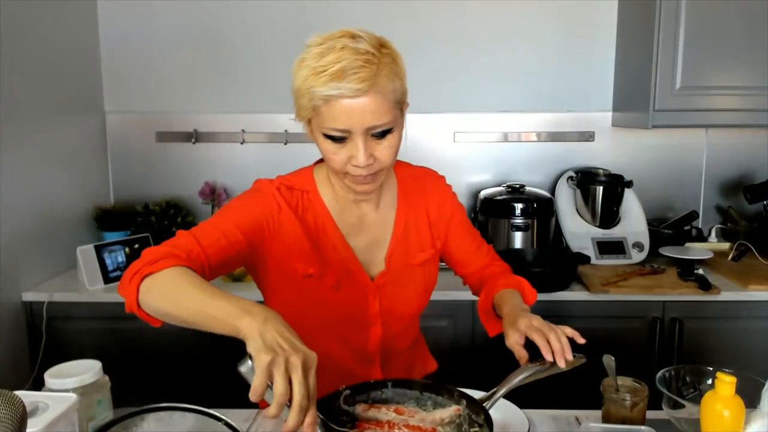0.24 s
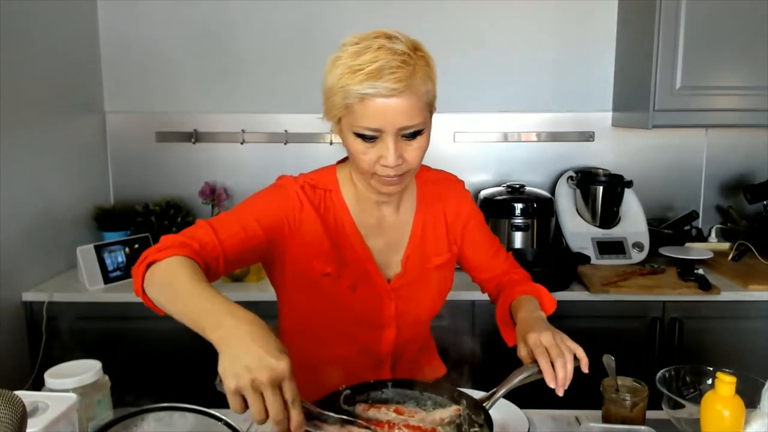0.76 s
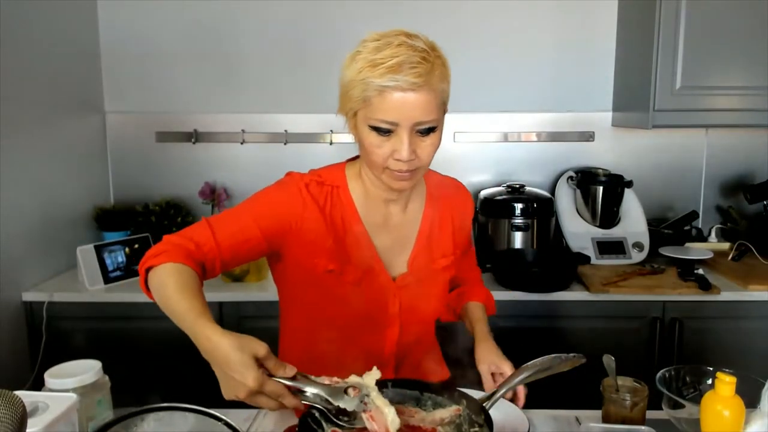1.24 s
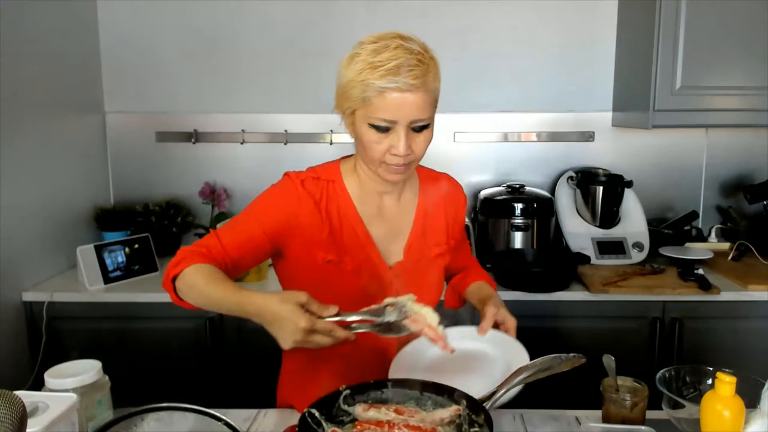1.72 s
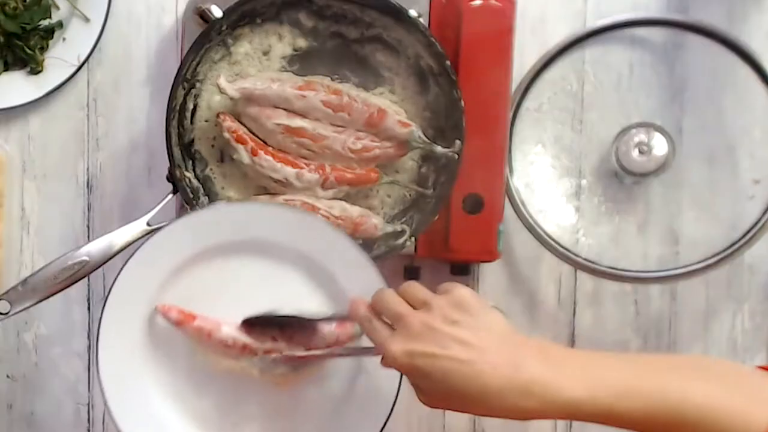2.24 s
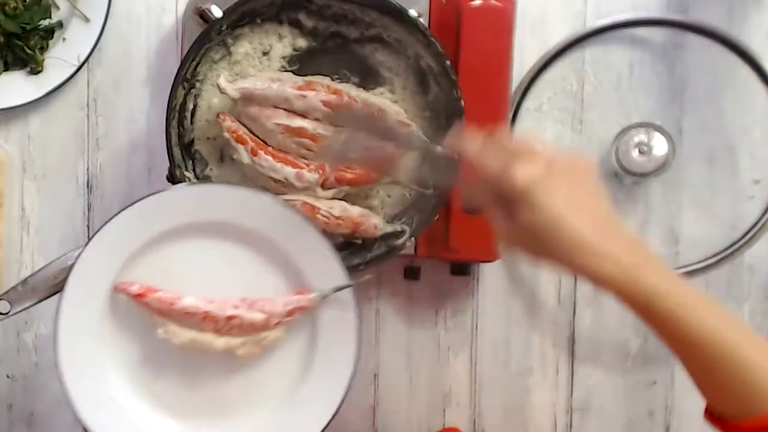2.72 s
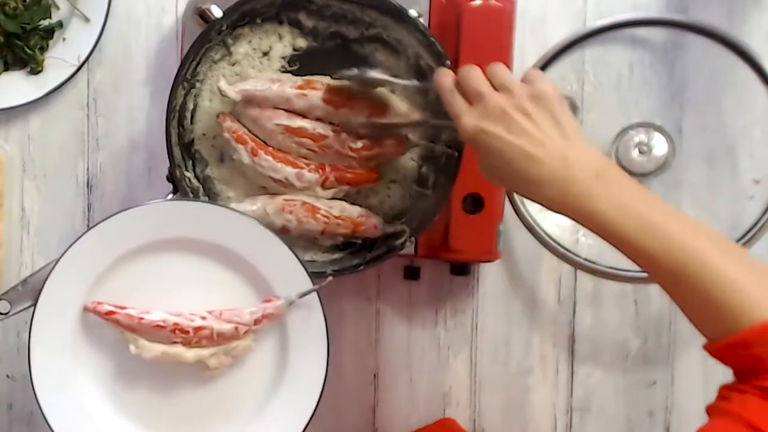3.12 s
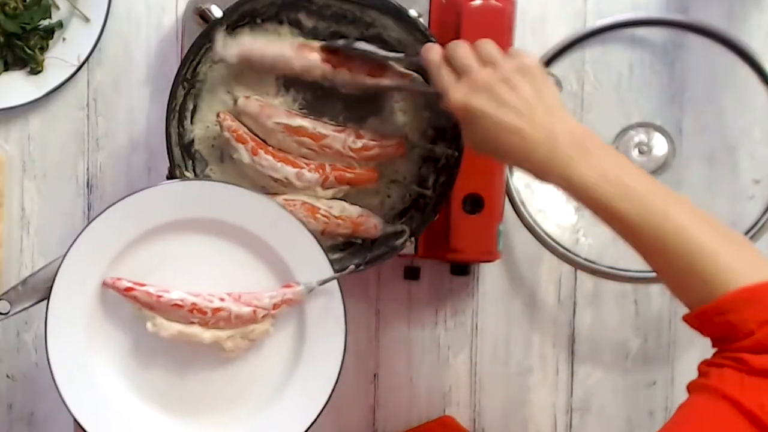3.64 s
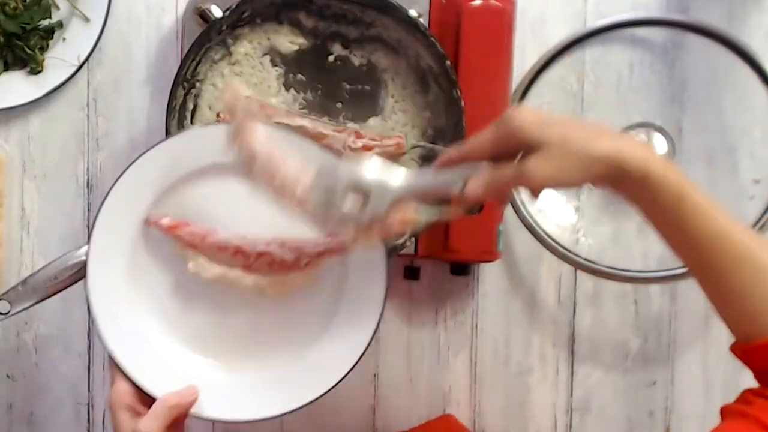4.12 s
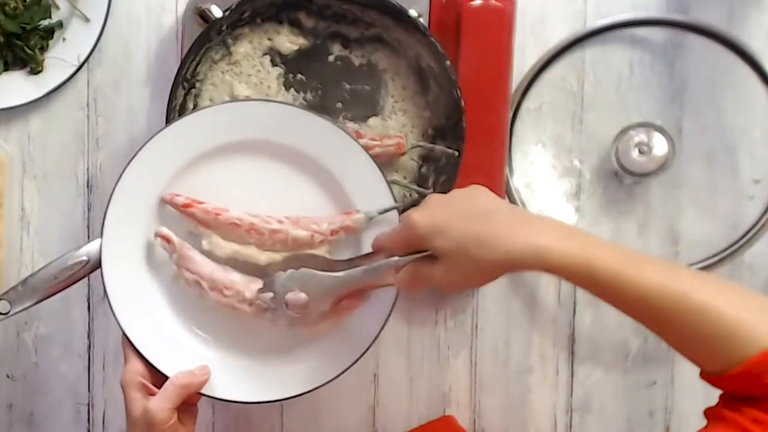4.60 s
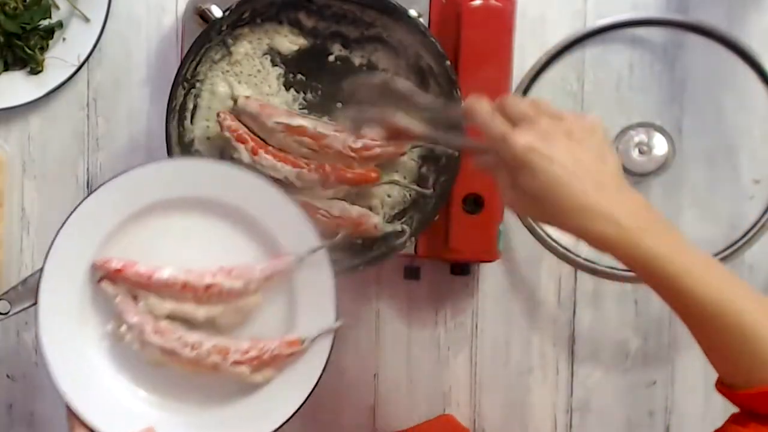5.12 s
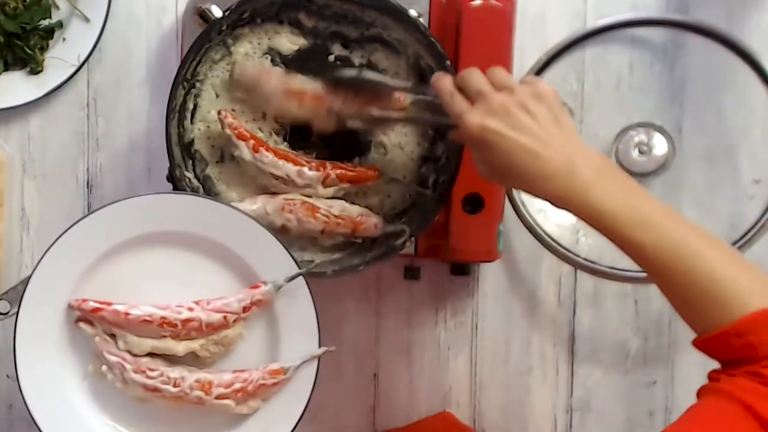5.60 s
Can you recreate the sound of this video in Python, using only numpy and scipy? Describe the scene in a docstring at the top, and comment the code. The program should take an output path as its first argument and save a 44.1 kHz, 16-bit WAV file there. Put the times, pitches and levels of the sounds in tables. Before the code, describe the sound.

Steel tongs knock dully on a simmering pan and clack sharply on a china plate, over faint, steady sizzle in a kitchen.

```python
"""Serving fish with steel tongs

Steel tongs lift fish from a simmering pan onto a china plate in a hard-walled kitchen.
The tongs knock on the pan and clack on the plate: chattering contacts ring decaying modes, with clatter and crack.
The worktop booms in two low modes. Noise and ringing bubbles make the sizzle, livelier at the start,
swelling when a piece is dragged; short resonant noise snaps in the sauce. A low drone lies underneath."""
import sys
import numpy as np
from scipy import signal
from scipy.fft import rfft, irfft, next_fast_len
from scipy.io import wavfile

SR = 44100
rng = np.random.default_rng(int(sys.argv[2]) if len(sys.argv) > 2 else 0)


def pcm_store(signal):
    """Save signal as 16-bit PCM."""
    levels = np.round(np.clip(np.atleast_2d(signal), -1, 1) * 32767)
    wavfile.write(sys.argv[1], SR, levels.astype(np.int16).T)


N = 258425
LEAD = SR // 10   # samples before the start, where a blow may already have fallen

# China plate modes. Each row: frequency in Hz, t60 in s before the grip shortens it,
# level in dB when struck in the well, level in dB when struck on the rim.
PLATE_MODES = [(392, 0.14, -18.5, 0.5), (452, 0.071, -11, -5), (573, 0.087, -1, -3.5),
               (639, 0.094, -10.5, -4.5), (981, 0.11, -6, -5.5), (1188, 0.12, -5, 1),
               (1253, 0.094, -5.5, -7), (1387, 0.55, -35, -13), (1592, 0.071, -13, -1),
               (1700, 0.36, -8.5, -9.5), (1763, 0.11, -3, -25), (1892, 0.022, -10, 6.5),
               (2210, 0.12, -38, -4), (2164, 0.087, 4, 0), (2306, 0.11, -5, -12), (2578, 0.025, -7, 2.5),
               (3140, .2, -10.5, -34), (3200, 0.09, -9, -6), (3592, 0.17, 3, -2.5), (3950, 0.1, 0.5, -2.5),
               (4370, 0.1, -10, -23), (4445, 0.065, -1, -40), (5190, 0.2, -24, -8.5),
               (5420, 0.073, -5, -19), (5980, 0.058, -11, -15), (6726, 0.05, 2, -9), (7070, 0.033, -8, -24),
               (8880, 0.067, -14, -16), (9130, 0.074, -2.5, -25), (9900, 0.021, -37, -34),
               (12400, 0.037, -16, -34)]
# Pan modes. Each row: frequency in Hz, t60 in s before the grip shortens it,
# level in dB when struck on the wall, on the floor, on the lip.
PAN_MODES = [(485.6, 0.084, 6, 3, -2), (734, 0.053, -1, -4.5, -1), (993, 0.087, -1, -5.5, -31),
             (1047, 0.2, -8, -16, -3), (1302, 0.036, 2, -4.5, -6), (1680, 0.047, 6, -8.5, -32),
             (1950, 0.075, 2.5, -10.5, 4.5), (2627, 0.096, 1.5, -13.5, -9), (3500, 0.036, -1, -34, 7.5),
             (3750, 0.024, 2.5, -11.5, -6), (4450, 0.071, 0, -21, -10), (4720, 0.03, -1, -30, -8),
             (5470, 0.024, 4.5, -19, 3.5), (5990, 0.089, 5.5, -20, -24), (7240, 0.029, -7, -17, 0),
             (7740, 0.013, -1, -22, -5), (8800, 0.015, -7, -20, 9), (12900, 0.023, -18, -34, -44)]
# Tongs on the plate. Each row: start in s, approximate peak in dB, place (0 well, 1 rim),
# contact chatter decay in s, clatter in dB over the body, crack in dB over the body.
PLATE_BLOWS = [(2.0677, -3, 0, 0.0063, 0, -4.5), (2.1825, -6.5, 0, 0.0059, -4, -7),
               (5.0955, -6.5, 1, 0.0079, 2, -11.5), (5.2125, -17, 1, 0.01, -4.5, -33)]
# Tongs on the pan. Each row: the same columns, place being 0 wall, 1 floor, 2 lip.
PAN_BLOWS = [(-.05, -19, 1, 0.0062, -5, -24), (.2768, -14.5, 0, 0.0051, 2, -19),
             (1.356, -15, 1, 0.019, -5, -17), (3.494, -20, 2, 0.0049, 2, -5.5)]
# Worktop booms. Each row: start in s, first-push peak of the upper mode in dB, of the lower mode in dB,
# second push over the first in dB, swell time of the upper mode in s.
WORKTOP_BOOMS = [(-.045, -36.5, -50, 3.5, .036), (.296, -29.5, -35, 2.5, .024), (0.438, -47, -45, 0, 0.017),
                 (1.285, -45, -39.5, -4, 0.018), (1.361, -28, -26, 5, 0.019),
                 (1.511, -34.5, -41, -12, .024), (2.77, -48, -54, -6, 0.034), (3.511, -33, -42, 7, 0.019),
                 (3.625, -42, -52, -11, 0.018), (3.69, -43, -49, 2, 0.023), (5.106, -40, -36.5, 5.5, .011),
                 (5.2, -47.5, -39.5, -2, .022), (5.699, -50.5, -65, -1, .03)]
# Sizzle spectrum. Each row: frequency in Hz, relative density in dB per Hz.
SIZZLE_SPECTRUM = [(30, -9.5), (90, -4), (150, 0.5), (190, -7.5), (450, -10.5), (1100, -9), (1700, -5),
                   (2600, -4.5), (4300, -6.5), (6200, -6.5), (7900, -9), (9300, -8), (11000, -12.5),
                   (13500, -9.5), (15800, -11)]
# Spectrum of the drag rush. Each row: frequency in Hz, relative density in dB per Hz.
DRAG_SPECTRUM = [(120, -7), (250, -1), (420, -6), (650, -0.5), (900, -10), (2200, -8), (4000, -23),
                 (6000, -19), (11000, -28), (15500, -35)]
# Food dragged through the sauce. Each row: start in s, length in s, level in dB.
DRAG_STROKES = [(-.15, 0.18, -48.5), (3.13, 0.16, -51), (3.574, 0.059, -54), (5.578, 0.14, -48.5)]
# Sharper snaps in the sauce under the tong tips. Each row: start in s, peak in dB, pitch in Hz.
SNAPS = [(0.193, -36.5, 1570), (3.254, -38.5, 1880), (5.6214, -34, 8250), (5.65, -29, 6420),
         (5.6688, -27, 6170), (5.797, -31, 9500)]
# Kitchen drone. Each row: frequency in Hz, resonance width in Hz, level in dB.
HUM_RESONANCES = [(61.3, 11, -67), (136, 11.5, -62)]
# Room decay. Each row: frequency in Hz, t60 in s.
ROOM_T60 = [(250, 0.43), (1000, 0.62), (3000, 0.49), (7000, 0.34), (14000, 0.19)]

WORKTOP_UPPER_HZ, WORKTOP_LOWER_HZ = 123.5, 82.6
LOWER_SWELL_RATIO = 0.92   # swell time of the lower mode over that of the upper
SETTLE_AFTER_S, SETTLE_LOWER_DB = 0.0319, -5   # second push, weaker in the lower mode
SIZZLE_DB, LIVELY_DB, CALMING_S = -46.5, 2.5, 0.65   # settled level, initial excess, its decay
STIRRED_DB = 3   # stirred-up sizzle over the level of the drag
DRAG_ATTACK_S, DRAG_RELEASE_S, DRAG_REST_DB = 0.05, 0.098, -63.5
SPITS_PER_S, SPIT_CYCLES = 500, 8.9
SIZZLE_SPIT_DB, DRAG_SPIT_DB = -7, -5.5   # spits over the hiss
ROOM_DB = -10
STOPBAND_EDGE_HZ = 15900 * 1.03


def blows(events, modes, grip, bass_cut_hz):
    """A chatter of contacts rings the modes, with a clatter of crowded minor modes and a bare crack."""
    out = np.zeros(LEAD + N)
    t = np.arange(SR // 2) / SR
    for start_s, peak_db, place, chatter_s, clatter_db, crack_db in events:
        strengths = [(mode[0], mode[2 + round(place)]) for mode in modes]
        sparse = rng.standard_normal(len(t)) * (rng.random(len(t)) < 0.05)
        touches = 0.2 * sparse * np.exp(-t / chatter_s)
        touches[0] = 1
        # hand and food shorten every ring by the grip factor
        rings = [amp(db) * ring(touches + 1e-18, hz, grip * mode[1])
                 for (hz, db), mode in zip(strengths, modes)]
        body = sum(rings[::2]) - sum(rings[1::2])   # neighbouring modes start in opposite directions
        # minor modes crowd round the strong ones and blur into noise of the same colour
        clatter = colour(rng.standard_normal(len(t)), strengths)
        clatter = clatter * np.exp(-t / (1.01 * chatter_s)) * np.clip(t / 0.001, 0, 1)
        crack = rng.standard_normal(len(t)) * np.exp(-t / (1.1 * chatter_s))
        blow = first_rms_one(body)
        blow = blow + amp(clatter_db) * first_rms_one(clatter)
        blow = blow + amp(crack_db) * first_rms_one(crack)
        at = LEAD + round(start_s * SR)
        out[at:at + len(t)] += amp(peak_db) / 4 * blow   # peaks stand about four times over the first rms
    # a small body radiates no bass
    return signal.sosfilt(signal.butter(4, bass_cut_hz, "high", fs=SR, output="sos"), out)


def worktop():
    """Blow and settling weight push the heavy top in turn, setting its two low modes going."""
    out = np.zeros(LEAD + N + SR)
    for start_s, upper_db, lower_db, settle_db, swell_s in WORKTOP_BOOMS:
        upper = amp(upper_db) * boom(WORKTOP_UPPER_HZ, swell_s)
        lower = amp(lower_db) * boom(WORKTOP_LOWER_HZ, LOWER_SWELL_RATIO * swell_s)
        first = LEAD + round(start_s * SR)
        second = LEAD + round((start_s + SETTLE_AFTER_S) * SR)
        out[first:first + len(upper)] += upper + lower
        out[second:second + len(upper)] += amp(settle_db) * (upper + amp(SETTLE_LOWER_DB) * lower)
    return out[LEAD:LEAD + N]


def boom(hz, swell_s):
    """A sine mode whose envelope swells to height 1 and dies."""
    age_s = np.arange(SR // 2) / SR
    envelope = (age_s / swell_s * np.exp(1 - age_s / swell_s)) ** 1.02
    return envelope * np.sin(2 * np.pi * hz * age_s)


def sauce():
    """A dense hiss of tiny bubbles with single spits; dragging stirs it up and adds a duller, grainier rush."""
    t = np.arange(N) / SR
    grains, stroke = spits(), dragging()
    sizzle = colour(rng.standard_normal(N) + amp(SIZZLE_SPIT_DB) * grains, SIZZLE_SPECTRUM)
    # same grains time-reversed, so the two layers do not coincide
    rush = colour(rng.standard_normal(N) + amp(DRAG_SPIT_DB) * grains[::-1], DRAG_SPECTRUM)
    steady = amp(SIZZLE_DB + LIVELY_DB * np.exp(-t / CALMING_S))
    sizzle_gain = np.hypot(steady, amp(STIRRED_DB) * stroke) * amp(0.37 * drift(25))
    rush_gain = (amp(DRAG_REST_DB) + stroke) * amp(1.5 * drift(40))
    return sizzle_gain * sizzle + rush_gain * rush


def spits():
    """Single bubbles burst at random and ring a few cycles at one of 14 pitches; rms 1."""
    born = rng.random(N) < SPITS_PER_S / SR
    size_db = 3.5 * np.minimum(rng.exponential(1, N), 3)
    bursts = born * amp(size_db) * rng.choice([-1, 1], N)
    pitches_hz = np.geomspace(700, 15000, 14)
    dealt = rng.integers(0, 14, N)
    total = 0
    for k, hz in enumerate(pitches_hz):
        # short high rings are struck harder so that the sum stays white
        total = total + hz * ring(bursts * (dealt == k) + 1e-18, hz, SPIT_CYCLES / hz)
    return rms_one(total)


def dragging():
    """Strength of the drag in time: each stroke rises, holds and dies away."""
    t = np.arange(N) / SR
    total = 0
    for start_s, length_s, db in DRAG_STROKES:
        rise = np.clip((t - start_s) / DRAG_ATTACK_S, 0, 1)
        fall = np.exp(-np.maximum(t - start_s - length_s, 0) / DRAG_RELEASE_S)
        total = total + amp(db) * rise * fall
    return total


def snaps():
    """Each snap is a few ms of noise in a broad resonance."""
    out = np.zeros(N)
    t = np.arange(SR // 50) / SR
    for start_s, peak_db, hz in SNAPS:
        burst = rng.standard_normal(len(t)) * np.exp(-t / 0.0012)
        snap = ring(burst, hz, 12.0 / hz)
        out[round(start_s * SR):][:len(t)] += amp(peak_db) * snap / np.abs(snap).max()
    return out


def kitchen(x):
    """Dense reflections from hard walls, each octave dying at its own rate."""
    t = np.arange(SR) / SR
    tail = 0
    for low_hz in 125 * 2. ** np.arange(7):
        octave = signal.butter(2, [low_hz, 2 * low_hz], "band", fs=SR, output="sos")
        band = signal.sosfilt(octave, rng.standard_normal(SR))
        tail = tail + band * amp(-60 * t / at_hz(ROOM_T60, low_hz * np.sqrt(2)))
    tail = tail * np.clip(t / 0.016, 0, 1)   # reflections build up over 16 ms
    return signal.fftconvolve(x, tail / np.sqrt(np.sum(tail ** 2)))[:len(x)]


def drone():
    """Appliances hum low: noise in narrow resonances."""
    return sum(amp(db) * rms_one(ring(rng.standard_normal(N), hz, 2.5 / width_hz))
               for hz, width_hz, db in HUM_RESONANCES)


def ring(x, hz, t60_s):
    """Two-pole resonator: a unit click sets a sine of height 1 ringing."""
    r = amp(-60 / (t60_s * SR))
    w = 2 * np.pi * hz / SR
    return signal.lfilter([0, np.sin(w)], [1, -2 * r * np.cos(w), r * r], x)


def colour(x, spectrum):
    """Give a white signal a spectrum; rms 1."""
    size = next_fast_len(len(x))
    gain = amp(at_hz(spectrum, np.fft.rfftfreq(size, 1 / SR)))
    return rms_one(irfft(rfft(x, size) * gain, size)[:len(x)])


def at_hz(points, hz):
    """Read a table on a log-frequency axis."""
    table = np.array(points)
    return np.interp(np.log(hz + 1), np.log(table[:, 0]), table[:, 1])


def drift(rate_hz):
    """Slow random wander, rms 1."""
    steps = rng.standard_normal(int(N / SR * rate_hz) + 3)
    return rms_one(np.interp(np.arange(N) / SR * rate_hz, np.arange(len(steps)), steps))


def amp(db):
    """dB to gain."""
    return 10 ** (np.asarray(db) / 20)


def rms_one(x):
    """Scale to rms 1."""
    return x / np.sqrt(np.mean(x ** 2) + 1e-20)


def first_rms_one(x):
    """Scale so that the first 10 ms have rms 1."""
    return x / np.sqrt(np.mean(x[:SR // 100] ** 2))


def scene():
    """Blows in the room, over worktop, sauce, snaps and drone."""
    hits = blows(PLATE_BLOWS, PLATE_MODES, grip=0.71, bass_cut_hz=358)
    hits = hits + blows(PAN_BLOWS, PAN_MODES, grip=0.82, bass_cut_hz=210)
    hits_in_room = (hits + amp(ROOM_DB) * kitchen(hits))[LEAD:]
    return (hits_in_room + worktop() + sauce() + snaps() + drone())[None]


def record(dry):
    """A steep low-pass cuts the top."""
    return signal.sosfilt(signal.cheby2(12, 70, STOPBAND_EDGE_HZ, fs=SR, output="sos"), dry)


dry = scene()
out = record(dry)
pcm_store(out)
```